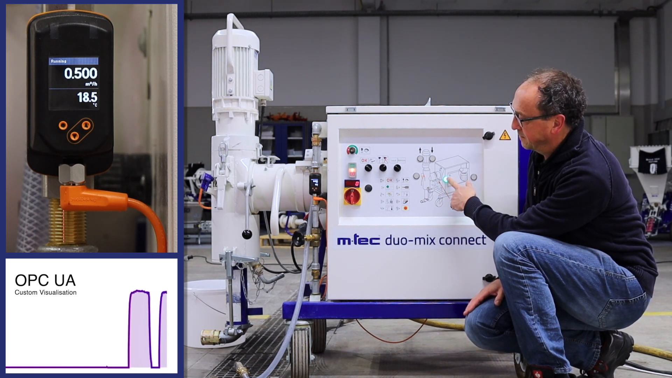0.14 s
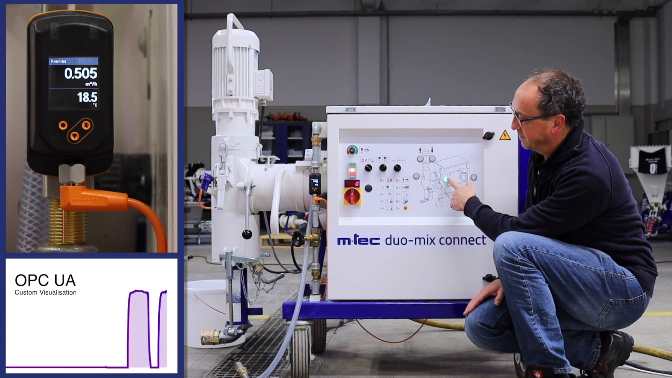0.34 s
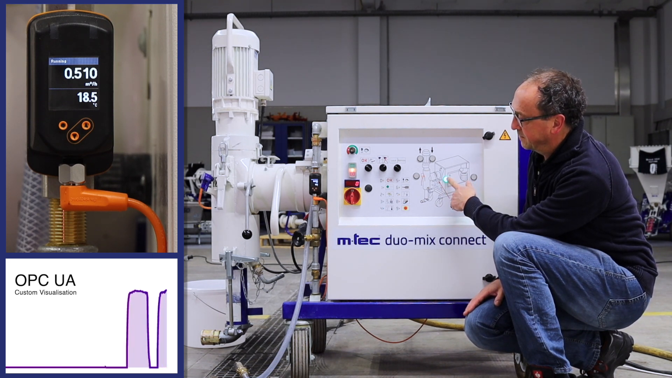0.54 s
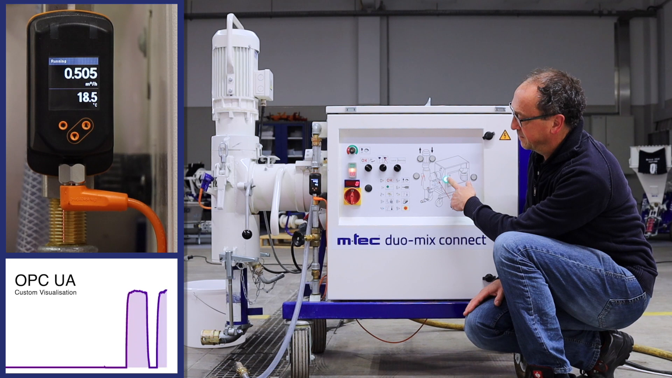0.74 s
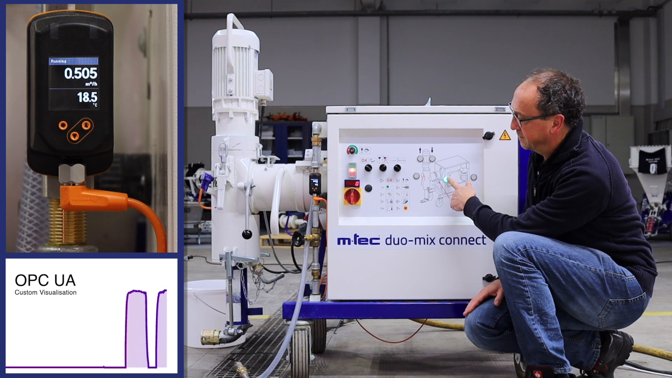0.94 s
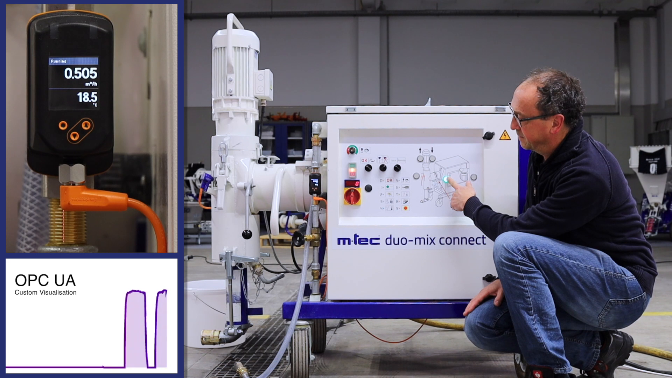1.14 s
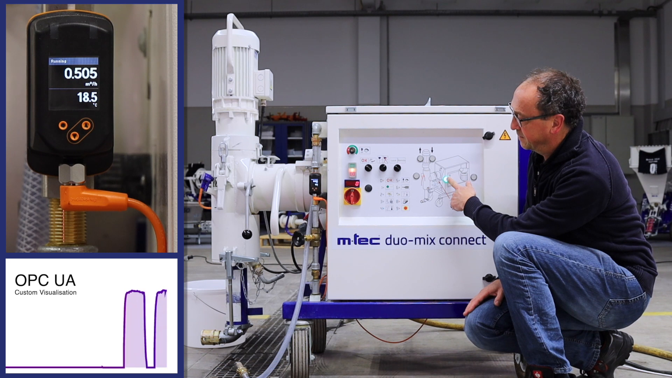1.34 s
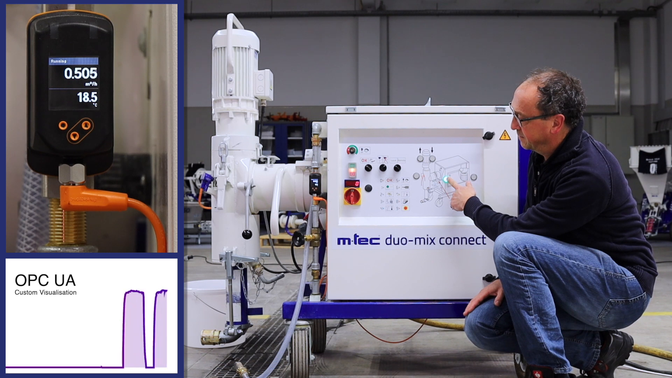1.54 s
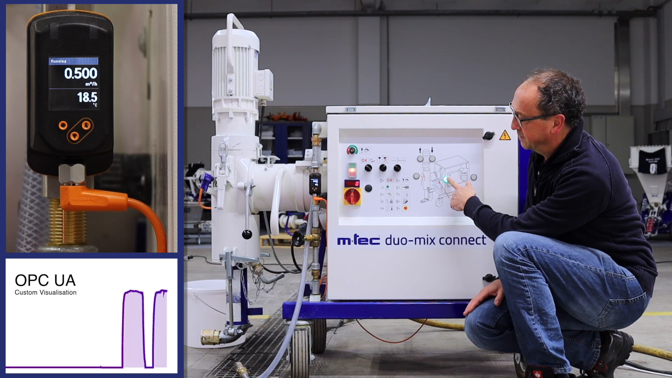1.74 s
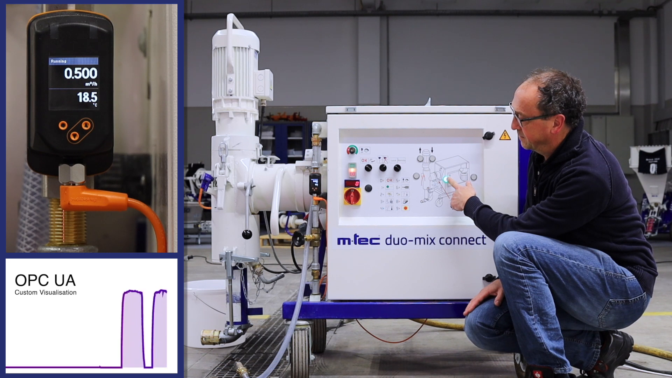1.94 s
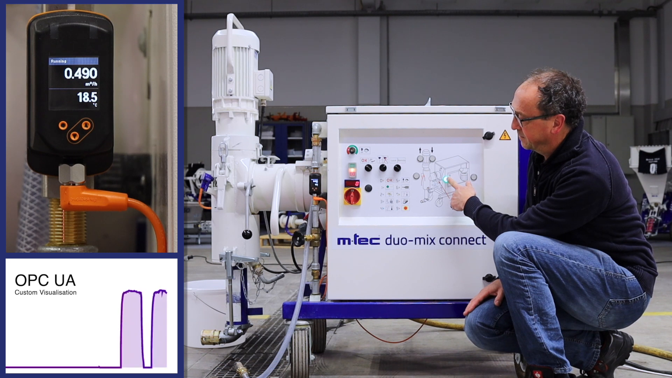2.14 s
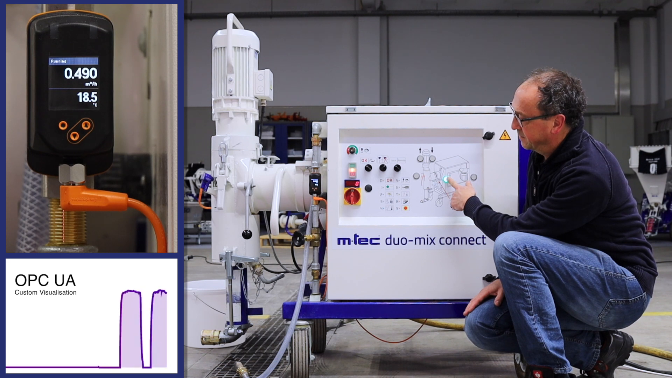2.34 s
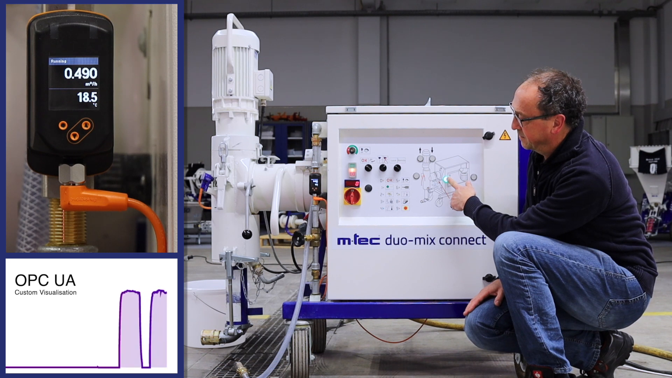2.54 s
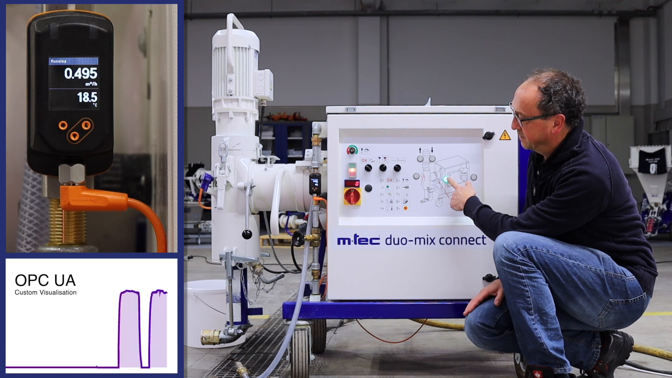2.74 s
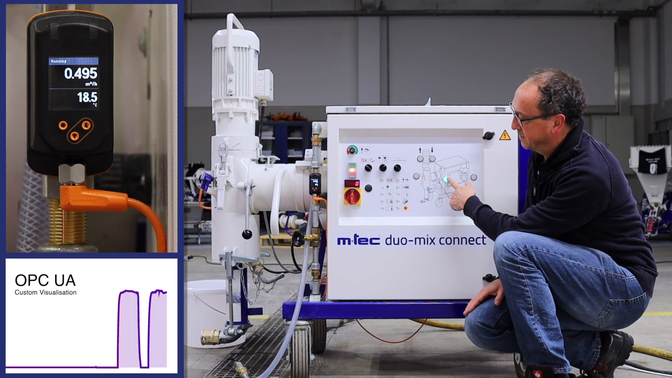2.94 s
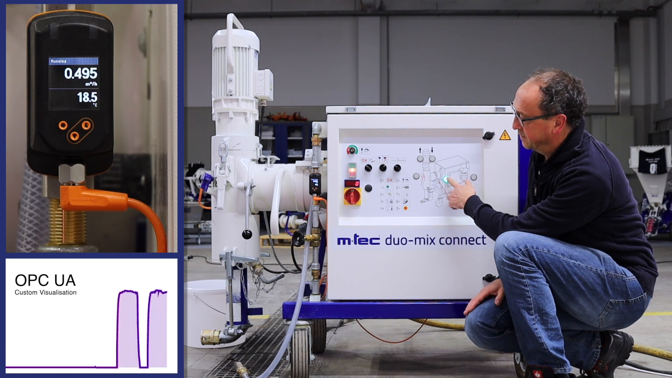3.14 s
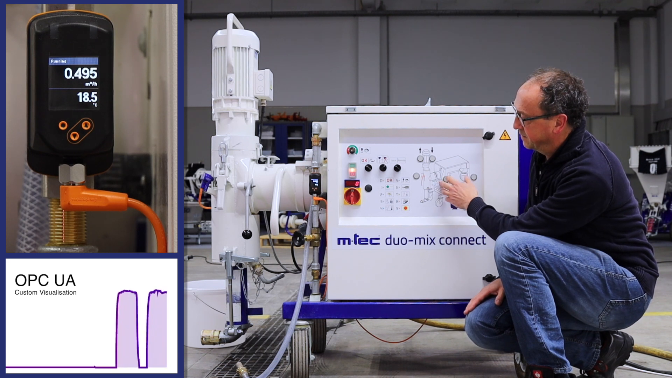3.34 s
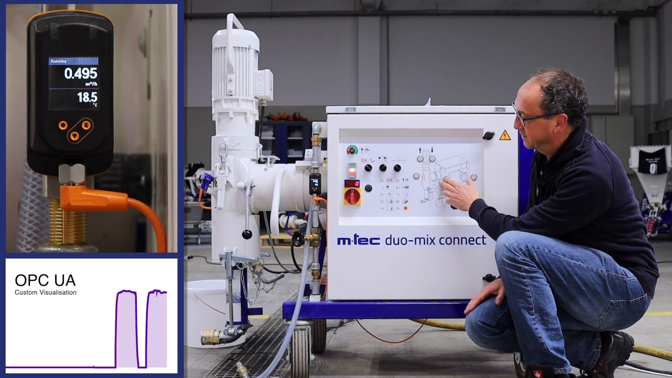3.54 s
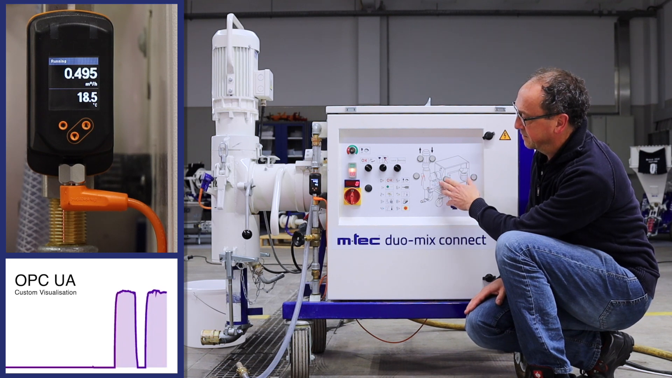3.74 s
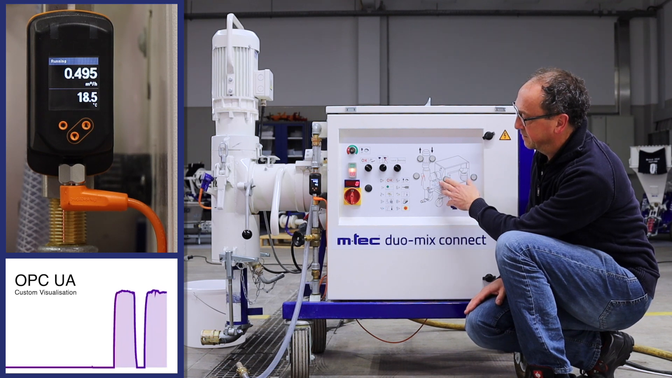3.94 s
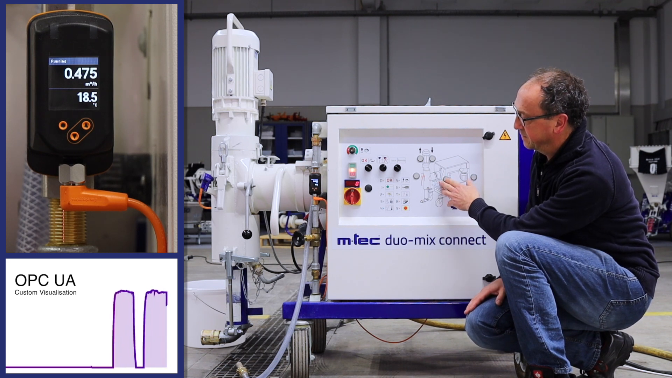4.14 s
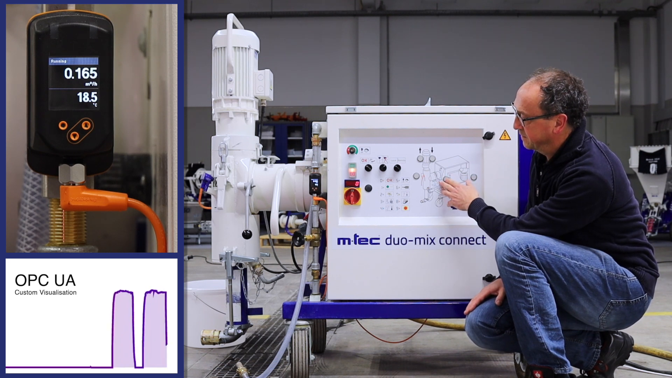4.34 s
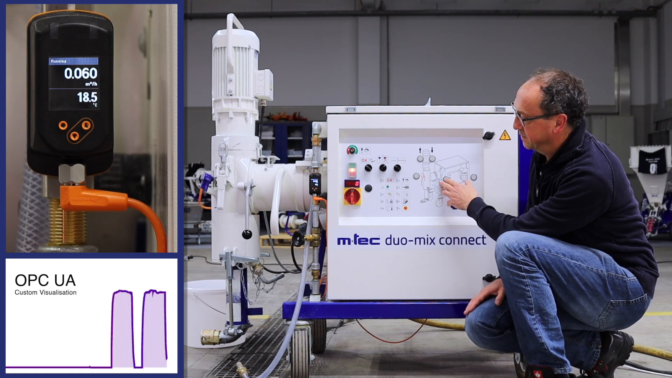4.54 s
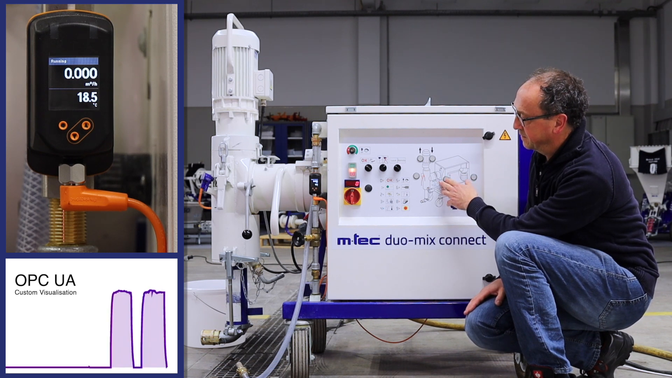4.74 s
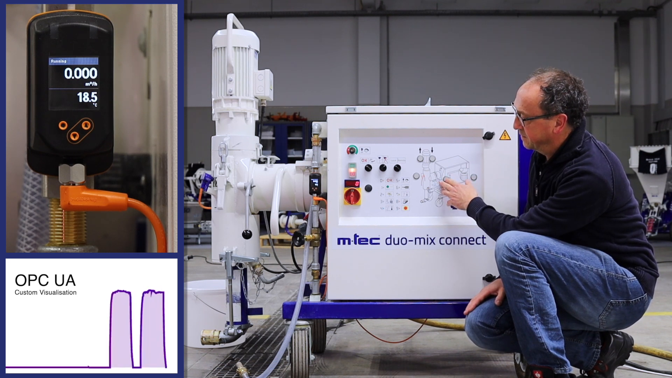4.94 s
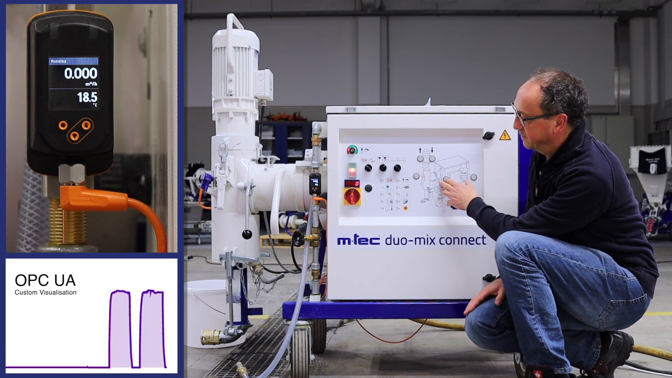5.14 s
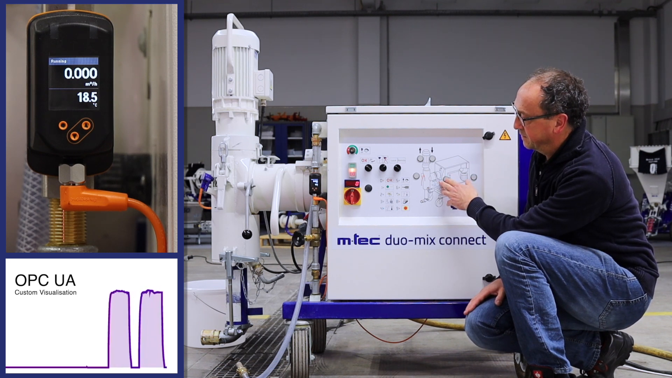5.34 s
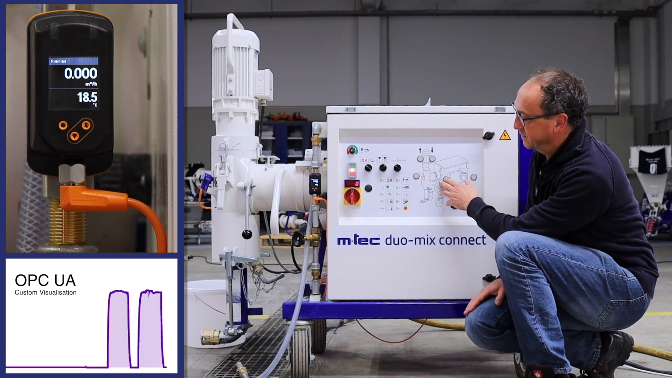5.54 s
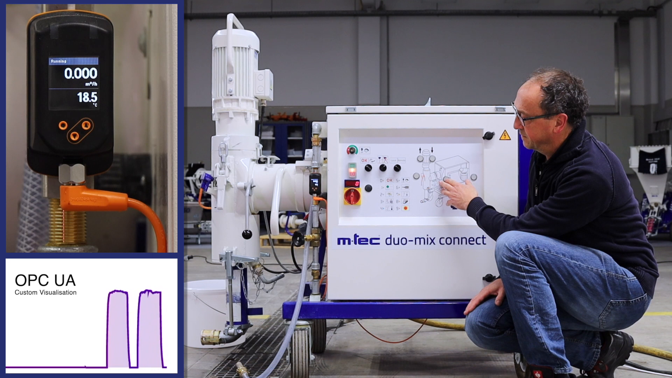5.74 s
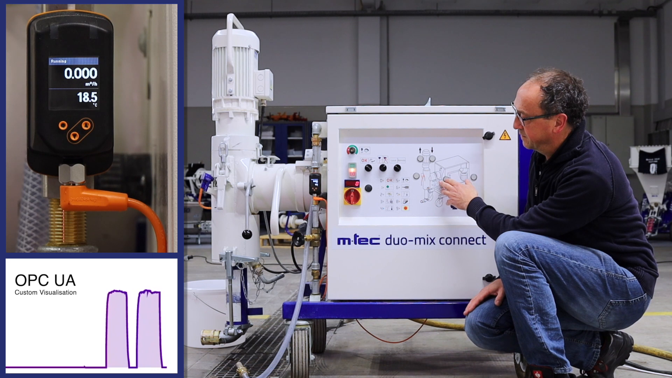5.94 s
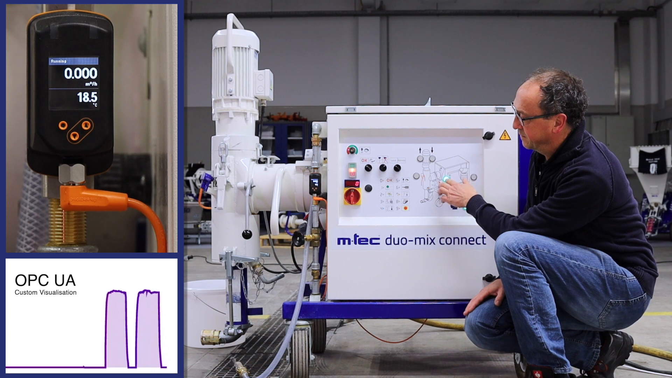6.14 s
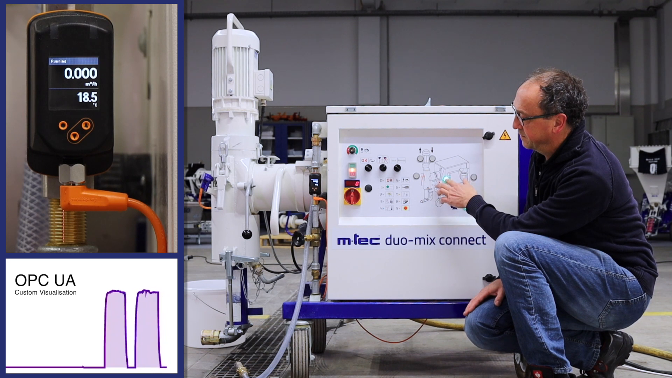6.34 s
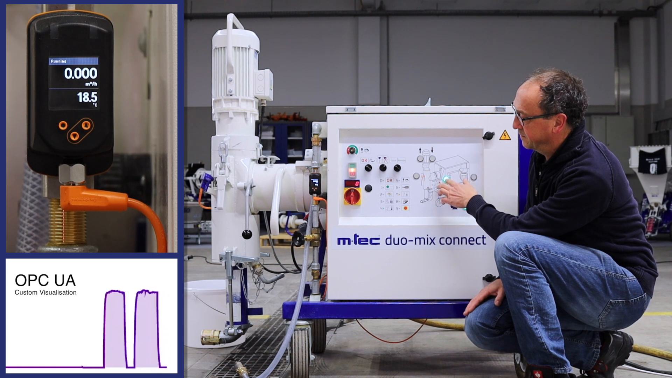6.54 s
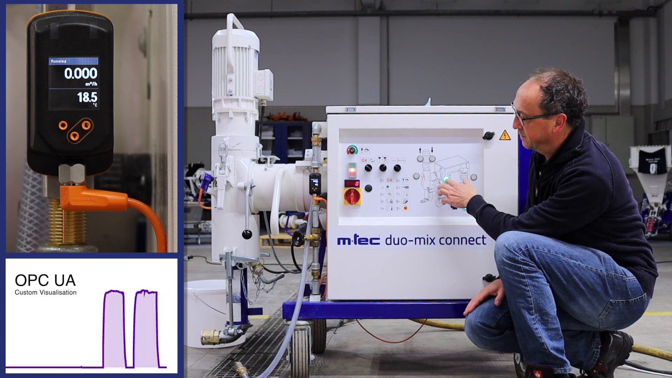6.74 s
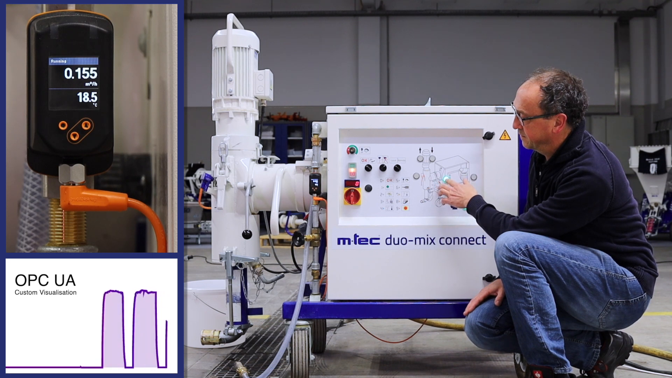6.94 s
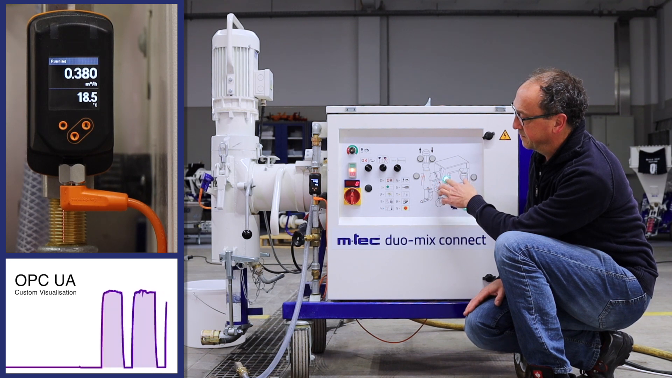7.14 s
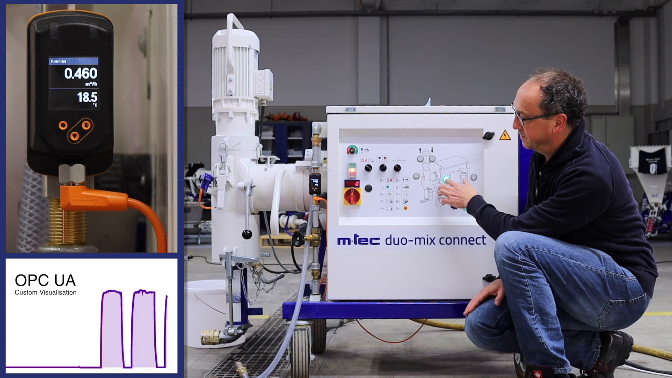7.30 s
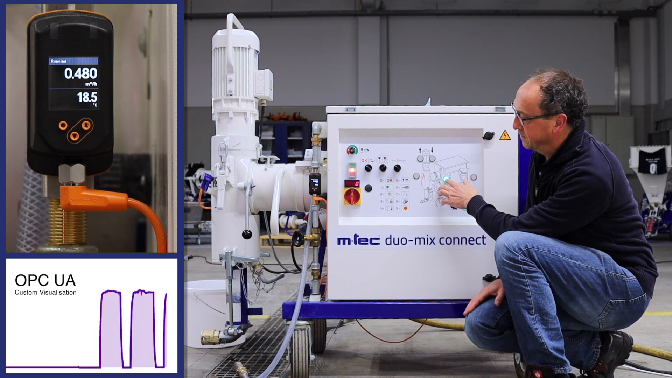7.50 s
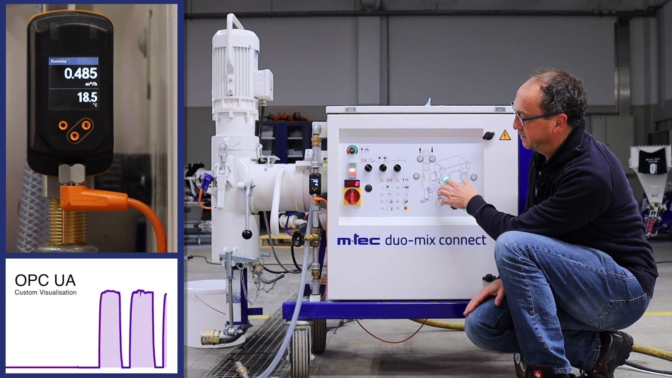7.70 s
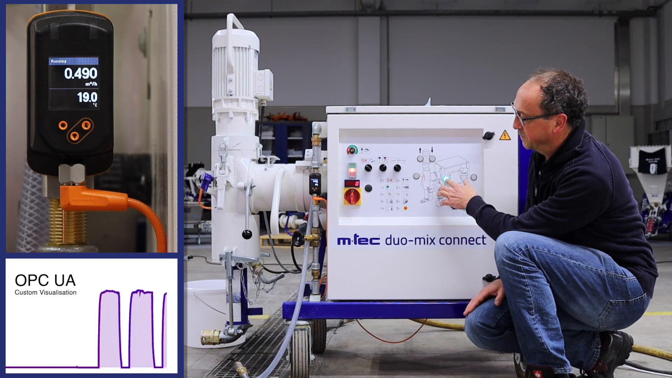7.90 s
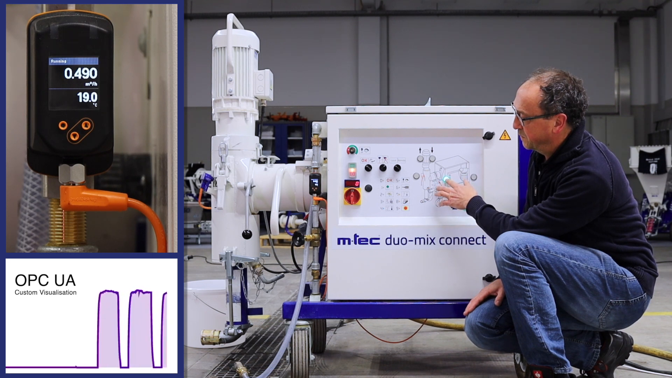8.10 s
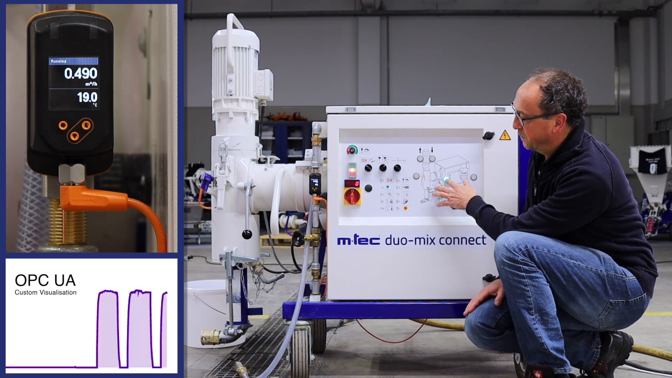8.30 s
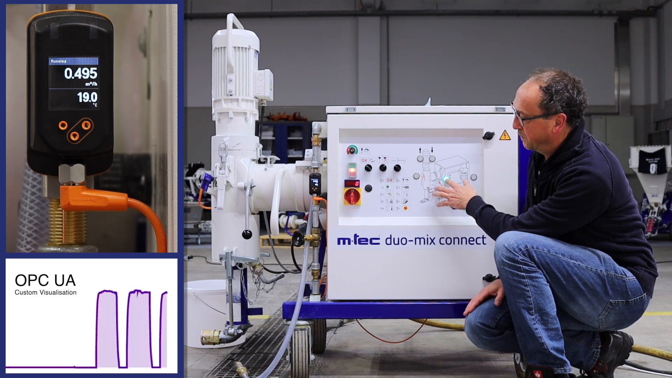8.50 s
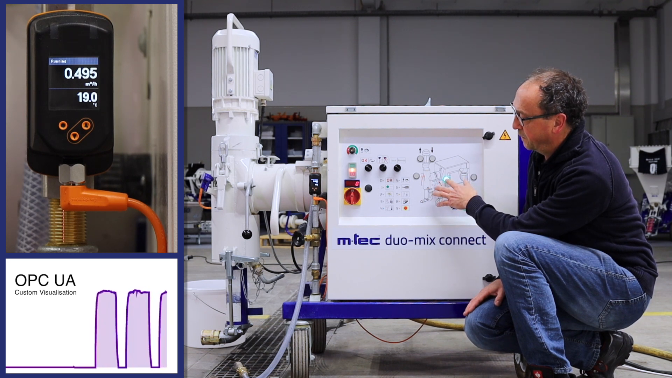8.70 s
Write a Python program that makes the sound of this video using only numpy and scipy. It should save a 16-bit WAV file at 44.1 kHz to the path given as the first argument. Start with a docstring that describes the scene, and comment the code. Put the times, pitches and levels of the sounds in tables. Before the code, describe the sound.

In a reverberant, ventilated machine hall, a pump gives a high, even whine with water rushing through it. It brakes abruptly with a short groan and clatter, and a soft wash of water and the echo die away. For a few seconds only quiet air noise remains. Then a relay snaps, the pump starts with a quick rattling jolt, and the whine and water flow carry on steadily.

```python
"""A small water pump whines high and steady over the rush of its water, in a ventilated machine hall.
The whine is the tone of the rotor's passing teeth. Switched off, the pump brakes in about a tenth
of a second with a groan and a rattle, water runs out softly and the hall rings on. A relay clicks,
the rotor jumps back to speed, swings about that speed a few times and settles."""
import sys
import numpy as np
from scipy import signal
from scipy.fft import rfft, irfft, next_fast_len
from scipy.io import wavfile

SR = 44100
rng = np.random.default_rng(int(sys.argv[2]) if len(sys.argv) > 2 else 0)


def dump_mix(stems):
    """Bounce the given channels to the path in sys.argv[1] as a 16-bit WAV at rate SR."""
    frames = np.atleast_2d(stems).T  # one column per channel
    limited = np.clip(frames, -1, 1)  # hard clip at full scale
    pcm = np.round(limited * 32767).astype(np.int16)
    wavfile.write(sys.argv[1], SR, pcm)


N = 390726

SHAFT_HZ, TEETH = 47.125, 36
OFF_S, ON_S, FULL_SPEED_S = 3.243, 6.085, 6.121


def shaft_speed(brake_s=.08, swing=0.1642, swing_hz=31.1, settle_s=0.067):
    """Share of full speed: steady, braked, restarted with a dying swing about the mains-locked speed."""
    t = clock()
    braked = np.exp(-np.maximum(t - OFF_S, 0) / brake_s)
    since = np.maximum(t - FULL_SPEED_S, 0)
    hunting = swing * np.exp(-since / settle_s) * np.sin(2 * np.pi * swing_hz * since)
    return np.where(t < ON_S, braked, run_up() + hunting)


def run_up():
    """Linear ramp from power-on to full speed."""
    return np.clip((clock() - ON_S) / (FULL_SPEED_S - ON_S), 0, 1)


# Whine before the stop and after the restart. Each row: time in seconds, level in dB.
WHINE_FIRST_RUN = [(0.03, -21.5), (0.37, -22.5), (0.6, -23.5), (0.68, -23), (1.36, -26.5), (1.87, -25),
                   (2.42, -29.5), (2.79, -24.5), (3.22, -28)]
WHINE_SECOND_RUN = [(6.3, -29), (6.36, -26.5), (6.55, -28.5), (6.66, -23), (7.25, -24.5), (7.35, -22),
                    (8.03, -21), (8.82, -21.5)]


def whine(angle, speed, lock_width=0.08):
    """Tone of the passing teeth, clear only near full speed."""
    times_s, levels_db = np.vstack([WHINE_FIRST_RUN, WHINE_SECOND_RUN]).T
    level = from_db(np.interp(clock(), times_s, levels_db))
    return np.sqrt(2) * level * np.sin(TEETH * angle) / (1 + ((speed - 1) / lock_width) ** 2)


# Each row: multiple of the whine, five levels in dB at -2 to +2 shaft rates, change on restart in dB.
WHINE_OVERTONES = [(2, -60.5, -56.5, -42.5, -54.5, -71, -3), (3, -59.5, -59.5, -44, -57, -59.5, -1.5),
                   (4, -63.5, -65.5, -57, -58, -73, 1.5), (5, -61, -63, -73, -58, -58.5, -0.5),
                   (6, -83, -68, -79.5, -69.5, -65, 0), (7, -82, -62, -71, -64, -67, 1),
                   (8, -105, -66.5, -69, -65, -71, -1.5)]


def overtones(angle, speed, flutter=0.17, lock_width=0.081, size=8192):
    """The rotor speeds up and slows within each turn, giving every overtone sidebands."""
    turn = np.arange(size) * 2 * np.pi / size
    sidebands = np.arange(-2, 3)
    out = 0
    for multiple, *levels_db, restart_db in WHINE_OVERTONES:
        # a pitch wobble inverts the first lower sideband
        phases = sidebands * rng.uniform(0, 2 * np.pi) + np.pi * (sidebands == -1)
        phases += rng.standard_normal(len(sidebands))
        partials = np.sin(np.outer(multiple * TEETH + sidebands, turn) + phases[:, None])
        one_turn = from_db(levels_db) @ partials
        level = np.where(clock() > ON_S, from_db(restart_db), 1) * (1 + flutter * drift(70))
        out += level * np.interp(angle % (2 * np.pi), turn, one_turn)
    return np.sqrt(2) * out / (1 + ((speed - 1) / lock_width) ** 2)


# Each row: multiple of the shaft rate, level in dB.
SHAFT_HARMONICS = [(4, -46), (8, -52), (12, -49.5), (15, -51), (23, -54.5), (25, -50), (32, -55.5),
                   (33, -68), (34, -55.5), (35, -46), (37, -44), (39, -47), (40, -57.5), (41, -64),
                   (132, -68), (150, -75.5), (156, -70)]


def shaft_hum(angle, waver=0.086):
    """Shaft tones shaken by the flow; those beside the whine make it throb once a turn."""
    return np.sqrt(2) * sum(from_db(db) * (1 + waver * drift(12)) * np.sin(multiple * angle)
                            for multiple, db in SHAFT_HARMONICS)


# Each row: centre in Hz, width in Hz, gain in dB.
HOUSING_MODES = [(571, 42, 8.5), (1078, 170, 2.5), (1470, 107, 1), (1870, 67, -2)]
# Braking and starting. Each row: start in seconds, tooth force in dB, rattle in dB, decay in seconds.
TORQUE_JOLTS = [(3.245, -22, -41.5, 0.076), (6.118, -22, -39, 0.055)]
JOLT_RISE_S = 0.0021


def groan(angle, bite):
    """Each jolt presses the teeth together; their gliding tone rings the housing modes it crosses."""
    force = sum(from_db(db) * gate(s, 0, JOLT_RISE_S, fall_s) for s, db, _, fall_s in TORQUE_JOLTS)
    teeth = np.sqrt(2) * bite * force * np.sin(TEETH * angle)
    return sum(from_db(db) * resonance(teeth, hz, width_hz) for hz, width_hz, db in HOUSING_MODES)


# Each row: frequency in Hz, relative density in dB.
RATTLE_WASH_SPECTRUM = [(100, -7), (600, 9.5), (1600, -1), (2600, 1), (4000, -4.5), (7000, -10),
                        (12000, -21), (15500, -32)]


def rattle_and_wash(angle, knock=0.49, wash_s=0.43, wash_db=-54):
    """Loose teeth clatter once a turn after each jolt; a soft wash of water runs out after the stop."""
    jolts = sum(from_db(db) * gate(s, 0, JOLT_RISE_S, fall_s) for s, _, db, fall_s in TORQUE_JOLTS)
    wash = from_db(wash_db) * gate(OFF_S, wash_s, JOLT_RISE_S, fall_s=.03)
    return (jolts + wash) * (1 + knock * np.sin(angle)) * unit_rms(noise(RATTLE_WASH_SPECTRUM))


# Each row: frequency in Hz, level in dB.
MOTOR_TONES = [(300, -47.5), (1174, -48.5)]


def motor_drive():
    """Electrical tones, on while powered; the upper one beats against a shaft tone."""
    t = clock()
    powered = (t < OFF_S) + run_up()
    return np.sqrt(2) * powered * sum(from_db(db) * np.sin(2 * np.pi * hz * t) for hz, db in MOTOR_TONES)


# Each row: frequency in Hz, density in dB per Hz.
WATER_SPECTRUM = [(30, -102.5), (70, -86.5), (155, -86.5), (190, -70.5), (380, -71), (470, -73),
                  (680, -66.5), (1250, -77), (1650, -70), (2700, -89), (5500, -92), (8000, -100),
                  (12500, -103), (15500, -109)]
# Each row: centre in Hz, width in Hz, lift in dB.
CASING_MODES = [(185.3, 11, 10), (242, 10.6, 11.5), (351.4, 23.5, 7.5), (1120, 58, 5), (2170, 110, 2)]


def water(speed, angle, throb=0.078, surge_db=1.4):
    """Water rushing through the pump stirs the casing, follows the speed and throbs once a turn."""
    rush = noise(WATER_SPECTRUM, CASING_MODES)
    return rush * speed ** 2 * (1 + throb * np.sin(angle)) * from_db(surge_db * drift(14))


# Each row: centre in Hz, width in Hz, level in dB.
FLOW_WHISTLES = [(2575, 58, -61.5), (3339, 154, -51)]


def whistles():
    """Hoarse flow whistles before the stop; the upper one beats against the whine's first overtone."""
    bands = sum(from_db(db) * narrow_noise(hz, width_hz) for hz, width_hz, db in FLOW_WHISTLES)
    return (clock() < OFF_S) * bands


# Switch, relay and valve. Each row: start in seconds, level in dB.
CONTACT_CLICKS = [(3.249, -48), (3.288, -52), (6.062, -55), (6.079, -33.5)]
# Each row: frequency in Hz, relative density in dB.
CLICK_SPECTRUM = [(60, -10), (230, 11), (600, -2), (1200, 0.5), (3300, -13), (4800, 1.5), (6300, -7),
                  (8500, -2.5), (15000, -8)]


def clicks(chatter_s=0.012):
    """Each contact chatters for a few milliseconds: a dry snap."""
    t = clock()
    force = sum(from_db(db) * (t >= s) * np.exp(-abs(t - s) / chatter_s) for s, db in CONTACT_CLICKS)
    return force * unit_rms(noise(CLICK_SPECTRUM))


# Each row: start in seconds, relative level in dB.
PUMP_TICKS = [(0.4399, -53), (0.7203, -43), (1.0061, -46), (7.3233, -43)]


def ticks(gain_db=-3.0):
    """Faint, thin ticks in the running pump."""
    force = sum(from_db(db + gain_db) * gate(s, 0, rise_s=.0005, fall_s=.006) for s, db in PUMP_TICKS)
    return force * narrow_noise(hz=4200, width_hz=900)


# Each row: start in seconds, length in seconds, level in dB.
HUM_SWELLS = [(3.278, 0.082, -53), (3.72, .52, -71.5)]


def low_hum(hz=69):
    """A soft hum swells as the rotor stops, and again half a second later."""
    level = sum(from_db(db) * gate(s, length_s, rise_s=.03, fall_s=.035) for s, length_s, db in HUM_SWELLS)
    return np.sqrt(2) * level * np.sin(2 * np.pi * hz * clock())


# Each row: frequency in Hz, reverberation time in seconds.
HALL_T60 = [(100, 1.36), (300, 1.05), (520, 1.82), (1000, 1.75), (1700, 1.91), (3400, 1.64), (6000, 1.2),
            (14000, 1.8)]
# Each row: frequency in Hz, phase lag in radians.
STANDING_WAVE_LAG = [(190, .15), (560, .6), (1150, 0.27), (1700, 0.79), (3400, .4), (5000, 0.26),
                     (9000, .1)]


def hall(x, wet_db=-0.97, standing_db=1.32, build_s=0.0089, absorb_hz=6500, size=66000):
    """A diffuse tail, weaker in the treble; standing waves lift and delay the strong steady tones."""
    t, hz = np.arange(size) / SR, np.fft.rfftfreq(size, 1 / SR)
    decay = lambda f: np.exp(-np.log(1000) * t / at_hz(HALL_T60, f))
    build = 1 - np.exp(-t / build_s)
    edges_hz = [0, 250, 700, 1300, 2400, 4200, 6000, 9000, 16000]
    diffuse = rfft(rng.standard_normal(size)) / (1 + (hz / absorb_hz) ** 2)
    tail = sum(irfft(diffuse * (hz >= low) * (hz < high), size) * decay((low + high) / 2)
               for low, high in zip(edges_hz, edges_hz[1:]))
    tail *= from_db(wet_db) * build / np.linalg.norm(build * decay(TEETH * SHAFT_HZ))
    overtone_multiples = [TEETH * k + side for k, *_ in WHINE_OVERTONES for side in (-1, 1, 0)]
    multiples = [k for k, _ in SHAFT_HARMONICS] + overtone_multiples + [TEETH]
    for f in [f for f, _ in MOTOR_TONES] + [k * SHAFT_HZ for k in multiples]:
        # set the tail's response at this tone to that of its standing wave
        wave, shape = np.exp(2j * np.pi * f * t), build * decay(f)
        standing = from_db(standing_db) * np.exp(-1j * at_hz(STANDING_WAVE_LAG, f)) - 1
        tail += 2 * np.real((standing - np.vdot(wave, tail)) * wave) * shape / shape.sum()
    # the pump has long been running, so the hall starts full of its sound
    whole_turns = round(size * SHAFT_HZ / SR)
    lead_in = x[:round(whole_turns * SR / SHAFT_HZ)]
    echo = signal.fftconvolve(np.r_[lead_in, x], tail)[len(lead_in):len(lead_in) + N]
    return (x + echo) / from_db(standing_db)


# Each row: frequency in Hz, relative density in dB.
VENTILATION_SPECTRUM = [(25, -28), (50, -20), (68, 1), (100, -8.5), (136, -6.5), (175, -8), (340, -8.5),
                        (580, -3), (900, -7), (1500, -13.5), (2300, -23.5), (3500, -27.5), (7000, -31),
                        (15500, -34)]


def ventilation(level_db=-58):
    """Steady air noise of the hall."""
    return from_db(level_db) * unit_rms(noise(VENTILATION_SPECTRUM))


def from_db(db):
    """Decibels to gain."""
    return 10 ** (np.asarray(db) / 20)


def clock():
    """Sample times in seconds."""
    return np.arange(N) / SR


def unit_rms(x):
    """Scale to an RMS of 1."""
    return x / x.std()


def at_hz(table, hz):
    """Read a table on a log-frequency axis."""
    table_hz, values = np.array(table).T
    return np.interp(np.log(hz + 1e-9), np.log(table_hz), values)


def gate(start_s, length_s, rise_s, fall_s):
    """An envelope that rises, holds and dies away."""
    since = np.maximum(clock() - start_s, 0)
    return (1 - np.exp(-since / rise_s)) * np.exp(-np.maximum(since - length_s, 0) / fall_s)


def drift(rate_hz, knots=6000):
    """Random wander between knots of spread 1."""
    return np.interp(clock() * rate_hz, np.arange(knots), rng.standard_normal(knots))


def noise(spectrum, modes=()):
    """Noise with a given density, lifted at its modes."""
    size = next_fast_len(N, True)
    hz = np.fft.rfftfreq(size, 1 / SR)
    gain = from_db(at_hz(spectrum, hz))
    for centre_hz, width_hz, db in modes:
        gain *= 1 + (from_db(db) - 1) / (1 + (2 * (hz - centre_hz) / width_hz) ** 2)
    return irfft(rfft(rng.standard_normal(size)) * gain, size)[:N] * np.sqrt(SR / 2)


def resonance(x, hz, width_hz):
    """Two-pole resonator, peak gain 1."""
    radius = np.exp(-np.pi * width_hz / SR)
    gain = (1 - radius ** 2) / 2
    feedback = [1, -2 * radius * np.cos(2 * np.pi * hz / SR), radius ** 2]
    return signal.lfilter([gain, 0, -gain], feedback, x + 1e-18)


def narrow_noise(hz, width_hz):
    """Noise twice through one resonator, RMS 1."""
    once = resonance(rng.standard_normal(N), hz, width_hz)
    return unit_rms(resonance(once, hz, width_hz))


def scene(jostle_rad=0.0032, judder_rad=0.015, shudder_db=2.5):
    """The pump and its switches in the hall, over the ventilation."""
    speed = shaft_speed()
    slip = np.minimum(10 * abs(speed - 1), 1)
    angle = 2 * np.pi * SHAFT_HZ * np.cumsum(speed) / SR
    # the load jostles the rotor; off its locked speed it judders in pitch and strength
    angle += jostle_rad * drift(8) + judder_rad * slip * drift(450)
    bite = np.minimum(speed * 10, 1) * from_db(shudder_db * slip * drift(300))
    teeth = bite * whine(angle, speed) + groan(angle, bite) + overtones(angle, speed)
    pump = teeth + speed ** 2 * shaft_hum(angle) + rattle_and_wash(angle) + motor_drive() + ticks()
    flow = water(speed, angle) + whistles()
    background = low_hum() + ventilation()
    return (hall(pump + flow + clicks()) + background)[None]


def record(dry):
    """Steep low-pass at 15.7 kHz."""
    return signal.sosfilt(signal.ellip(12, .1, 80, 15700, fs=SR, output="sos"), dry)


dry = scene()
out = record(dry)
dump_mix(out)
```